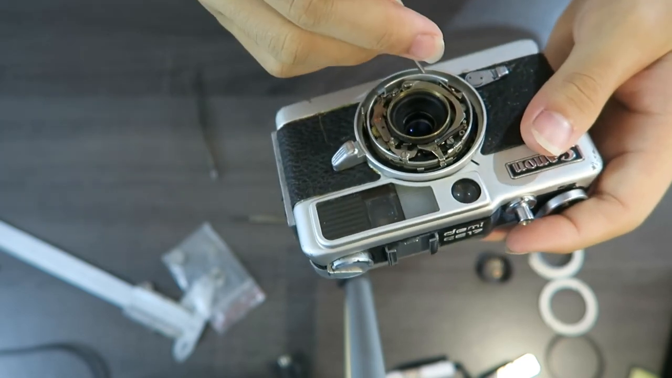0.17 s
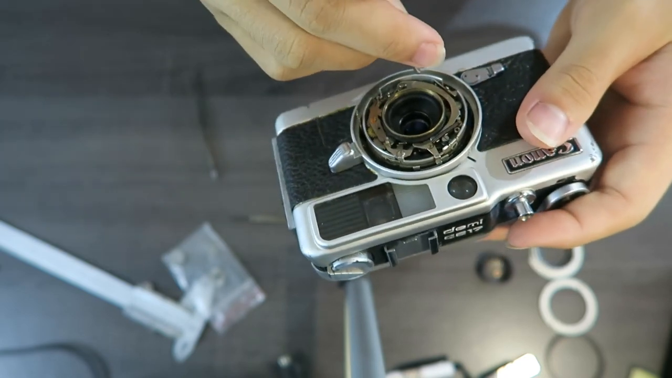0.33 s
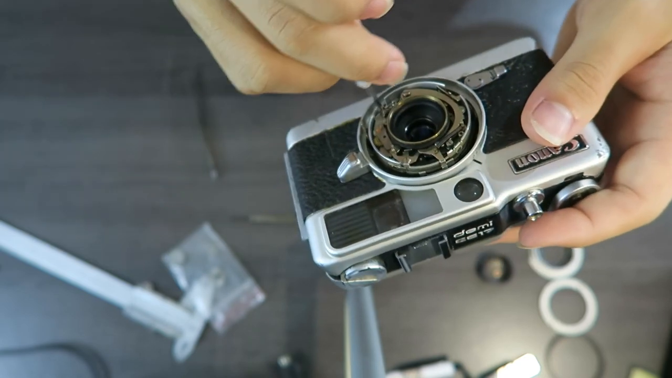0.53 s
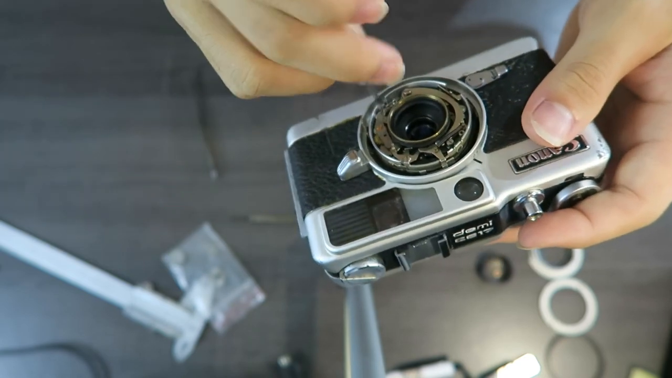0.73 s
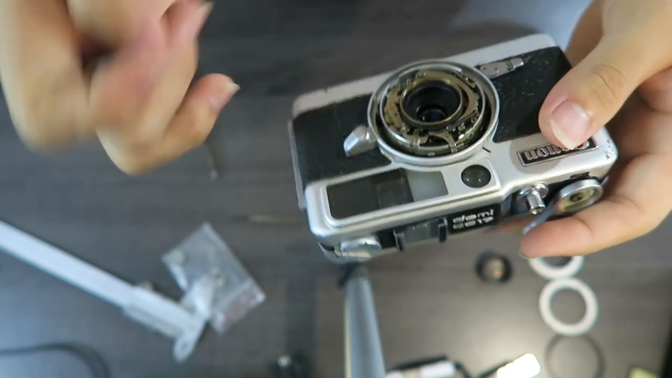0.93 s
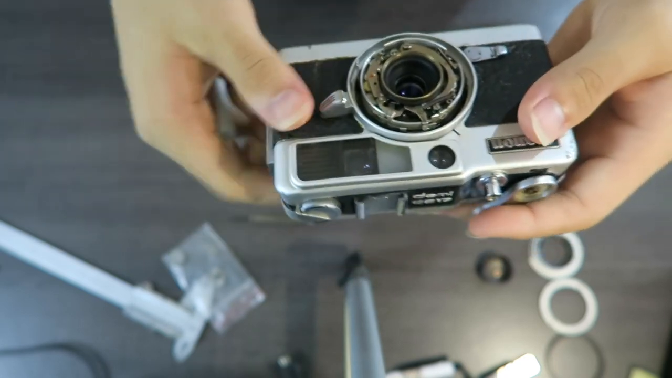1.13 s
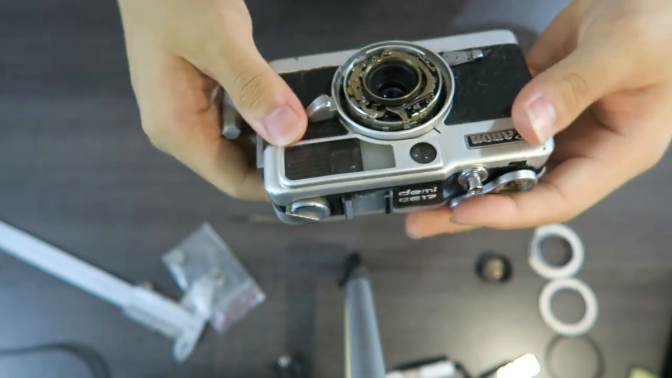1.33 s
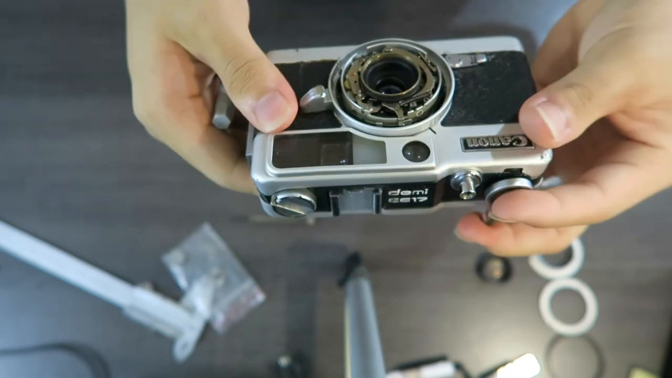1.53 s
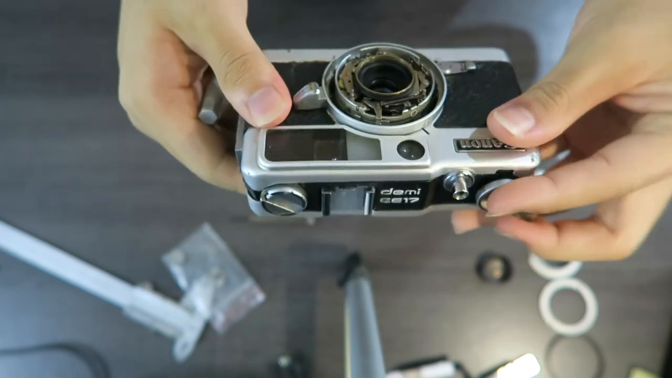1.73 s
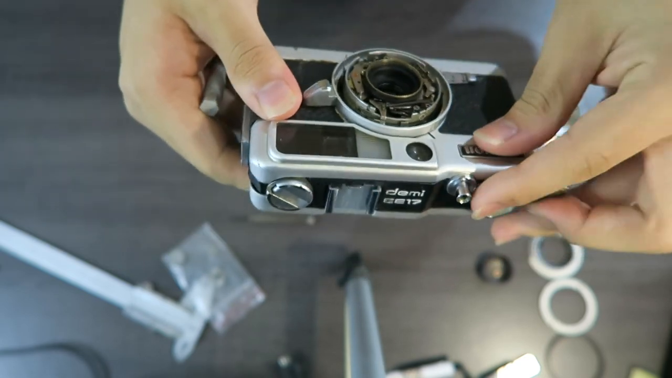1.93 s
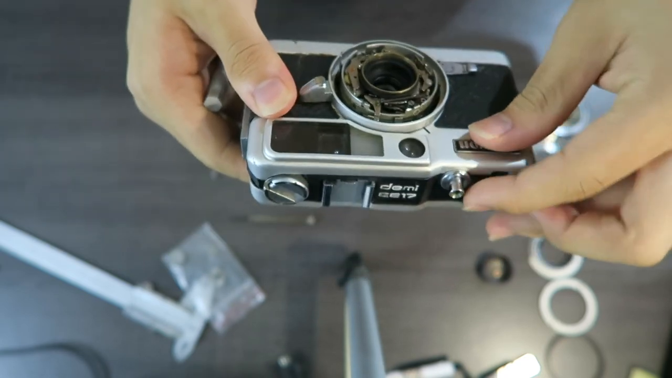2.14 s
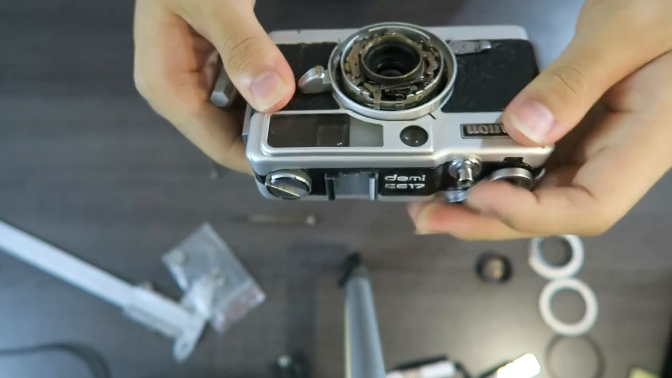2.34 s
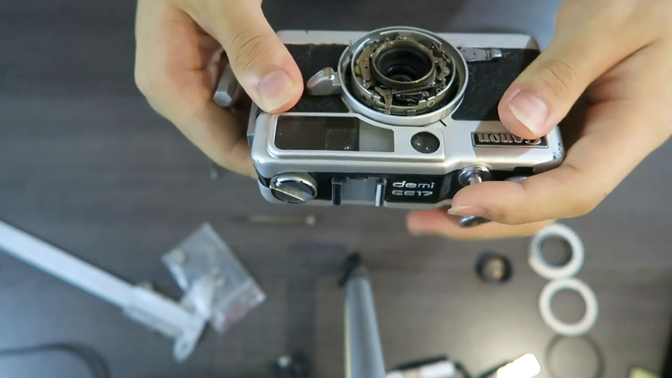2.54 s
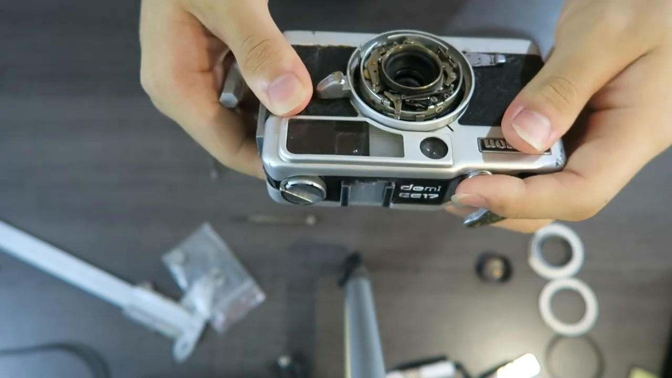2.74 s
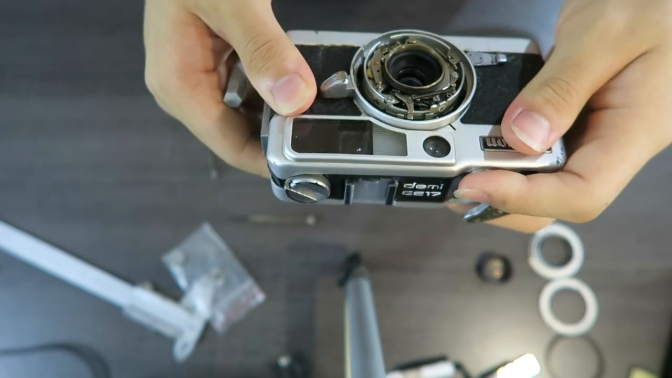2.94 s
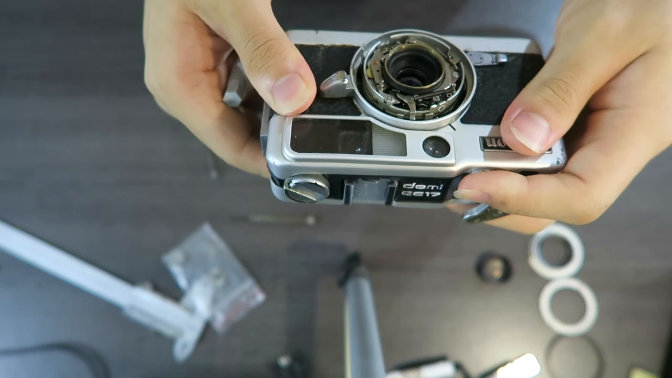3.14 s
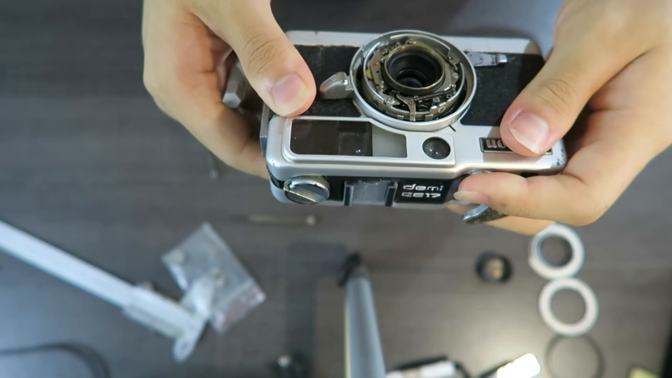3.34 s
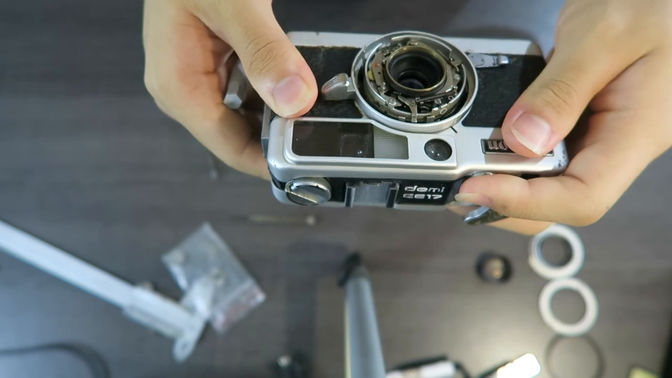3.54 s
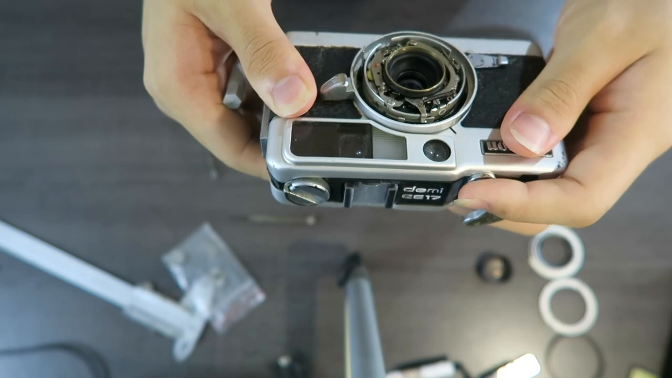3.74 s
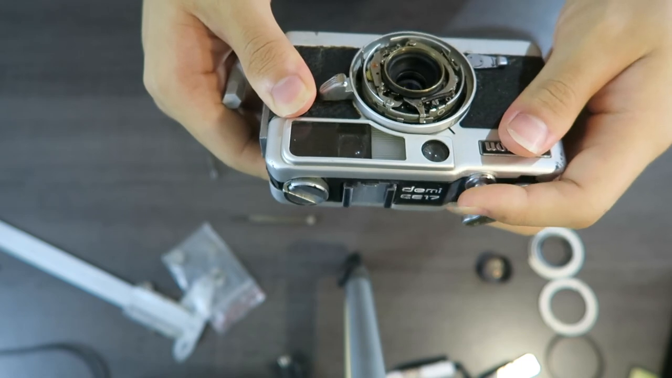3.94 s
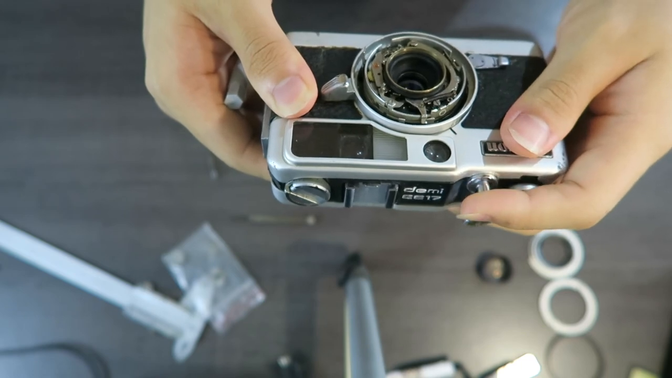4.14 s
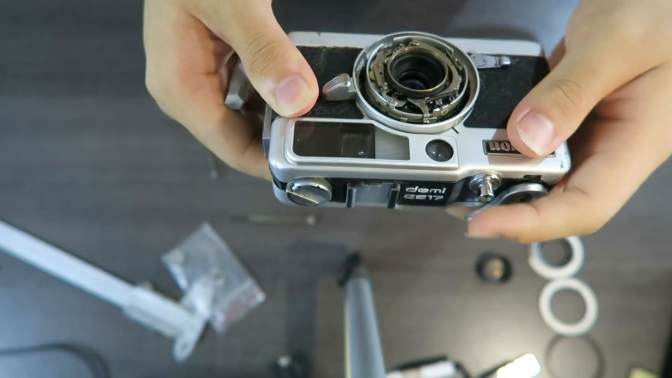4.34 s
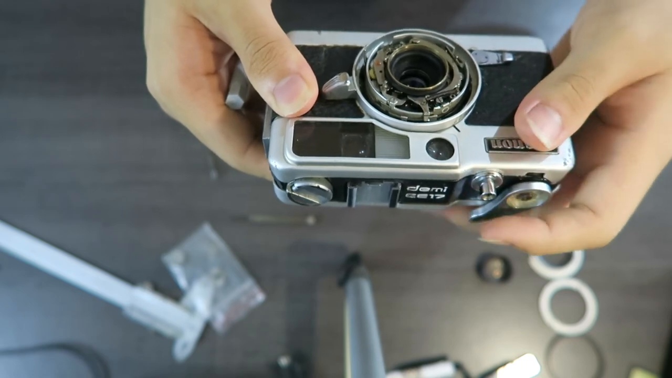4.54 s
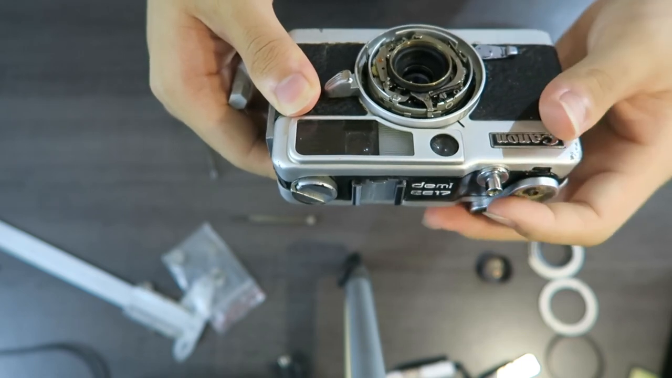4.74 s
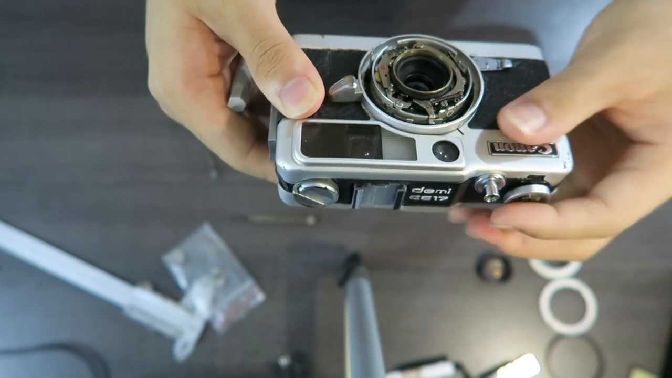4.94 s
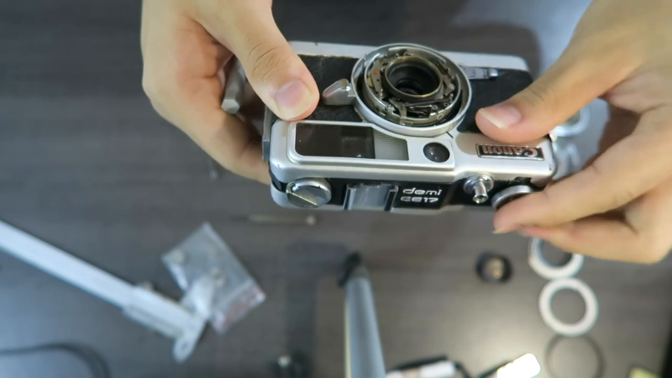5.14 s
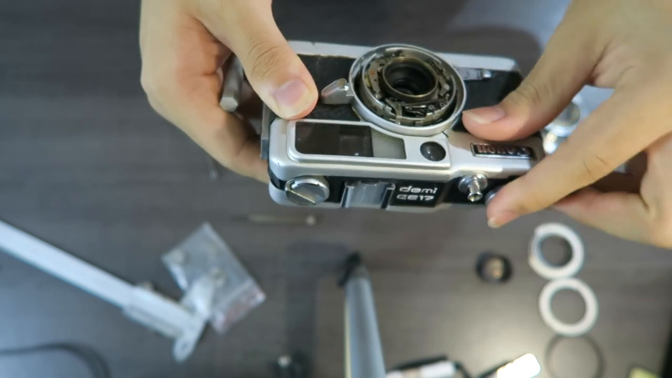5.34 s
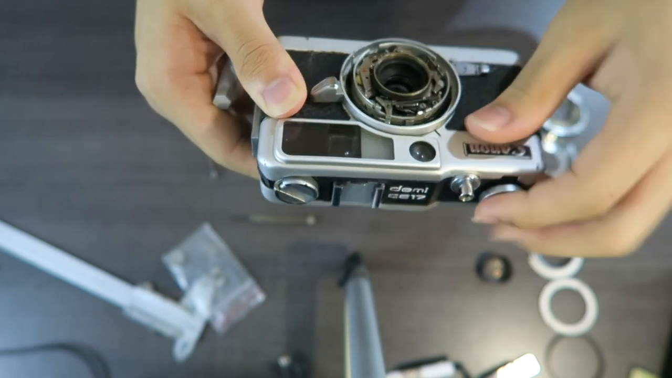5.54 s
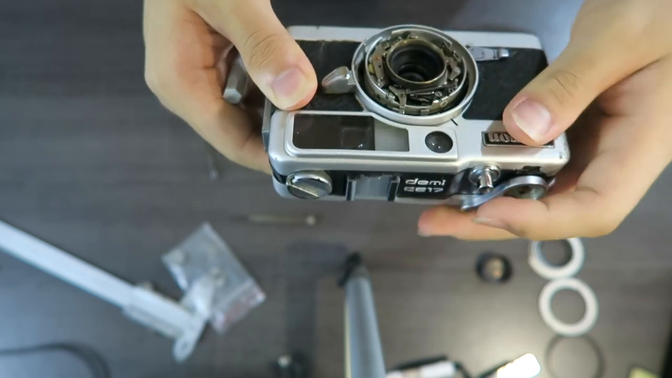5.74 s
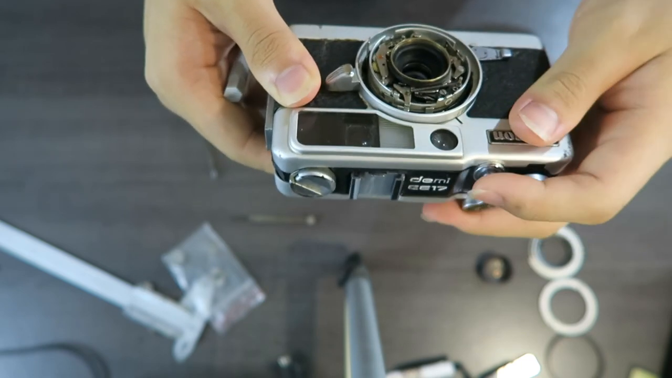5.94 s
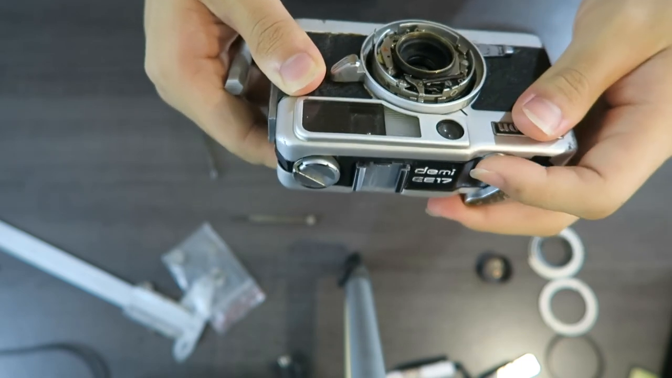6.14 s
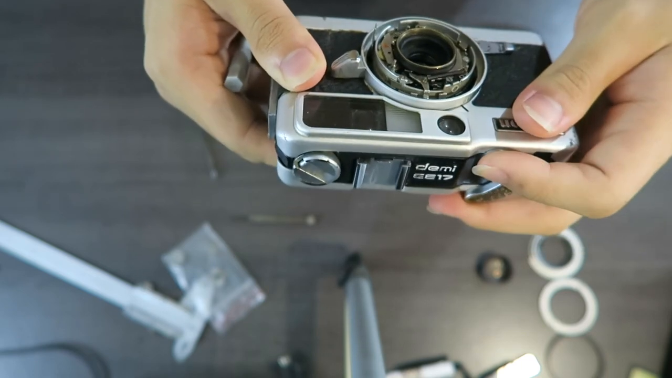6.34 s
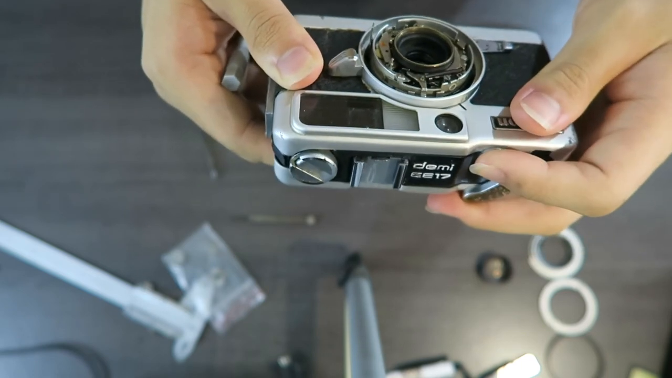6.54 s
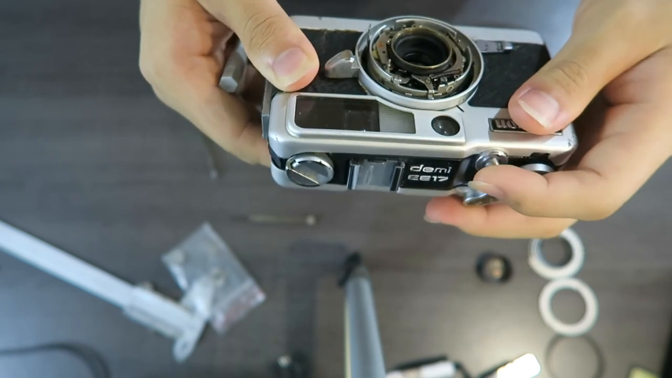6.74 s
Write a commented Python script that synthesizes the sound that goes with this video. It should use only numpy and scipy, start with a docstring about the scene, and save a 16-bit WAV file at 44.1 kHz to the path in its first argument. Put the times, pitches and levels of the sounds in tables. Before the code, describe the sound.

Very close stereo phone pickup at a desk in a quiet room: hands work a small metal camera with its shutter exposed. Faint ticks and scratchy rubs come first, then a lever snap and a thin gear whir, a rapid ratchet return, a loud shutter snap with short buzz, and a near-still pause. The winding and firing then repeat over a faint, uneven low hum and soft hiss.

```python
"""Small film camera, wound and fired

A small film camera with its shutter laid open is wound and fired by hand just under a phone on a desk.
Levers snap and a ratchet ticks as noise bursts ringing the thin metal body; a gear train whirs as ticking
teeth through resonances; finger rubs and the rustling tails after some blows are tiny random contacts.
Under it lie a throbbing low hum around 120 and 133 Hz, drawn as one line following the stronger pitch,
and faint room hiss made of filtered noise."""
import sys
import numpy as np
from scipy import signal
from scipy.fft import rfft, irfft
from scipy.io import wavfile
from scipy.ndimage import uniform_filter1d

SR = 44100
rng = np.random.default_rng(int(sys.argv[2]) if len(sys.argv) > 2 else 0)


def put_to_file(sound):
    """Save the sound as 16-bit audio at rate SR, in the file named by the first command-line argument."""
    columns = np.atleast_2d(sound).T  # one column per channel
    safe = np.clip(columns, -1, 1)
    whole_steps = np.round(safe * 32767)
    wavfile.write(sys.argv[1], SR, whole_steps.astype(np.int16))


N = 303849
TIME = np.arange(N) / SR


def undb(db):
    """Turn decibels into a plain gain."""
    return 10 ** (np.asarray(db) / 20)


def level(x, db):
    """Scale a sound by its RMS (average strength) to a level in dB."""
    return x * undb(db) / np.sqrt(np.mean(x ** 2))


def shaped(x, gain_at):
    """Filter by a gain given as a function of frequency."""
    f = np.maximum(np.fft.rfftfreq(len(x), 1 / SR), 1)
    return irfft(rfft(x) * gain_at(f), len(x))


def slope(points):
    """Gain along (Hz, dB) points, joined by straight lines on a log frequency axis."""
    hz, db = np.transpose(points)
    return lambda f: undb(np.interp(np.log(f), np.log(hz), db))


def mode(f, hz, width):
    """Complex response of one resonance, gain 1 at its centre."""
    return 1 / (1 + 1j * (f / hz - hz / f) * hz / width)


def narrow_noise(hz, width, db):
    """Noise squeezed twice through one resonance, so only a narrow band is left."""
    return level(shaped(rng.standard_normal(N), lambda f: mode(f, hz, width) ** 2), db)


def walk(rate):
    """Random levels held 1 / rate seconds and smoothed twice; spread near 1."""
    k = int(SR / rate)
    steps = np.repeat(rng.standard_normal(N // k + 1), k)
    return 1.3 * uniform_filter1d(uniform_filter1d(steps, k), k)[:N]


def grains(rate, spread_db, smooth):
    """Tiny random contacts of uneven size (rate per second) over a smooth scrape."""
    hit = rng.random(N) < rate / SR
    size = undb(spread_db * np.minimum(rng.exponential(size=N), 4))
    contacts = level(hit * size * rng.standard_normal(N), 0)
    return contacts + smooth * rng.standard_normal(N)


# The low hum around 120 and 133 Hz, drawn as one line following the stronger pitch.
# Each row: time in seconds, pitch in Hz, level in dB.
HUM = [(0.0, 114.9, -49), (0.21, 128.9, -56), (0.31, 114.9, -49.5), (1.0, 118.8, -49.5), (1.09, 133.5, -54),
       (1.3, 132.7, -46.5), (1.42, 120.9, -48.5), (3.01, 123.7, -42), (3.05, 120.4, -56),
       (3.15, 130, -48.5), (3.43, 132.9, -39.5), (3.67, 124.3, -40.5), (3.84, 133.1, -37.5),
       (4.09, 134.0, -44), (4.22, 135.4, -32), (4.45, 134.1, -47.5), (4.8, 133, -34), (4.85, 136.3, -56.5),
       (4.99, 121, -53), (5.35, 131.6, -43), (5.64, 133, -50.5), (5.76, 122.3, -47.5), (5.97, 121.7, -43),
       (6.12, 125, -57), (6.43, 134.3, -48), (6.72, 129.4, -57.5), (6.89, 132, -57)]
# Low rumbles beside it. Each row: centre in Hz, width of one filter pass in Hz, level in dB.
RUMBLE = [(51.3, 26, -52), (84, 18, -48.5), (180.4, 12, -56.5)]


def hum():
    """A throbbing low hum as one sine line between about 120 and 133 Hz, with narrow rumbles."""
    s, hz, db = np.transpose(HUM)
    pitch = np.interp(TIME, s, hz) + 4 * walk(21)
    turn = 2 * np.pi * np.cumsum(pitch) / SR
    strength = np.sqrt(2) * undb(np.interp(TIME, s, db) + 2.7 * walk(25))
    rumble = sum(narrow_noise(*row) for row in RUMBLE)
    # the hum reaches one microphone port a little earlier
    return rumble + strength * np.array([np.sin(turn + 0.24), 1.2 * np.sin(turn - .15)])


# Colour of the hiss shared by both channels. Each row: frequency in Hz, gain in dB.
HISS = [(18, -55), (30, -26), (134, -10), (239, -20), (328, -22.5), (937, -34.5), (2290, -37.5),
        (6210, -48), (7090, -48.5), (11700, -58.5), (13000, -76), (14400, -70), (16000, -104.5)]
# Colour of the hiss that is opposite left and right. Each row: frequency in Hz, gain in dB.
WIDE = [(18, -82.5), (30, -54.5), (64, -28), (131, -10), (204, -19.5), (287, -9), (384, -17.5),
        (449, -11.5), (569, -21), (780, -22), (3980, -40.5), (14000, -52), (16000, -82)]
# Faint thin lines in the hiss. Each row: centre in Hz, width of one filter pass in Hz, level in dB.
WHINE = [(7020, 180, -73), (14100, 300, -81.5)]
HISS_DB, WIDE_DB = -49, -49


def air():
    """Steady filtered noise, partly opposite in the two channels."""
    mid = level(shaped(rng.standard_normal(N), slope(HISS)), HISS_DB)
    side = level(shaped(rng.standard_normal(N), slope(WIDE)), WIDE_DB)
    thin = [sum(narrow_noise(*row) for row in WHINE) for _ in range(2)]
    return mid + np.array([side, -side]) + np.array(thin)


# Metal on metal. Each row: time in seconds, peak level at 3-7 kHz in dB, then against that peak
# the body knock in dB, the lever ring in dB and the bright tick in dB.
CLICKS = [(0.1071, -37, -9.5, -24, -7), (0.2991, -46.5, -8, 0, -32), (0.3667, -44, -4, -4, -11),
          (0.4204, -26.5, -10.5, -12, -7.5), (0.6007, -46, 4, 3, -9), (0.6274, -41.5, -8, -7, -5),
          (0.8115, -38, -20, -21, -1), (0.8204, -35.5, -27, -25, 0.5), (0.83, -30.5, -12.5, -30, -6.5),
          (0.8457, -41, -25, -24, -9), (0.9502, -45, -16, -0.5, -3), (1.2117, -47.5, -2, 5.5, -2),
          (1.2286, -39.5, -7, -6, -12), (1.2682, -41, -8, 6.5, -19), (1.281, -25, -23, -9, -17),
          (1.3915, -49, 4, 4.5, -23), (1.5929, -43, -4, 5.5, -7), (1.71, -32, -13, -5.5, -4.5),
          (1.8542, -42, 5.5, 15.5, -11), (1.9129, -40, -27, 5.5, -14), (1.9606, -24, -15, -6, 7),
          (1.9675, -12.5, -15.5, -2.5, 1.5), (2.3809, -22.5, -18, 3, -23), (2.5631, -29.5, -10, -2, -14),
          (2.7104, -40, -15, -5, -23), (2.721, -44, -2, 7.5, -3), (2.7358, -44, -16, -14, -8),
          (2.8013, -47, -2, -1, -5), (2.9435, -7.5, -16.5, -7, 4), (3.7821, -40, -22, -7.5, 9),
          (3.7943, -24, -9, 0, 8), (3.7996, -14.5, -11.5, -3.5, 6), (4.129, -52, -16, 1, -15),
          (4.1437, -44, -21, -19.5, -19), (4.1551, -47, -9.5, 5, -23), (4.3981, -37.5, -25, 1, -2.5),
          (4.7361, -26.5, -8, 2, -31), (4.9297, -41, -14, 2, -16), (5.3152, -25.5, 2.5, -12, 8),
          (5.3223, -13, -19, -1, 2), (5.711, -18, -16, 2.5, -27), (6.008, -41, -19, -16, -19),
          (6.0172, -45.5, -23, 5, -6), (6.0367, -44, -30, -1, -7), (6.0964, -38.5, -21, 1, -25),
          (6.2008, -8.5, -13, -5, 2.5), (6.7236, -23, -7.5, -2, 2.5), (6.7356, -12.5, -16, -3, 3),
          (6.847, -46, 2, 7.5, -3)]
PAWL_KNOCK_DB, PAWL_RING_DB, PAWL_TICK_DB = -19.5, -8, -4  # against the peak
PAWL_DULLS_DB, PAWL_FIRST_DB = -1.5, -1.5  # tick change per tooth; the first tooth is softer


def struck():
    """All contacts: single clicks and the teeth of each ratchet run."""
    contacts = list(CLICKS)
    for run, (_, db, _) in zip(teeth_s(), RATCHETS):
        for k, s in enumerate(run):
            peak_db = db + PAWL_FIRST_DB * (k == 0)
            contacts.append((s, peak_db, PAWL_KNOCK_DB, PAWL_RING_DB, PAWL_TICK_DB + PAWL_DULLS_DB * k))
    return contacts


# The four bands of a click: main snap, body knock, lever ring, bright tick.
# Each row: low edge in Hz, high edge in Hz.
CLICK_EDGES_HZ = [2900, 7200], [400, 1250], [1150, 3100], [6800, 14500]
# How the metal body rings, also under rubbing. Each row: pitch in Hz, level in dB,
# seconds to fade by 60 dB.
BODY = [(720, 8, 0.11), (1026, -8.5, 0.029), (1517, -2, 0.082), (1700, -4, 0.0067), (2460, -2, 0.064),
        (3245, -11, 0.055), (3770, -5, 0.0041), (4670, -24.5, 0.027), (6400, -8, 0.012), (7600, -10, 0.016),
        (10500, -15, .03), (11400, -9.5, 0.036), (12300, -10.5, 0.017)]
# Desk and walls answer each click band, in the same order.
# Each row: level in dB, seconds to fade by 60 dB.
TAILS = [(-25.5, 0.43), (-12, 0.27), (-23, 0.42), (-24.5, 0.22)]
CONTACT_MS = 12.06  # the main burst falls 60 dB in this time, the weaker rattle 14 dB


def clicks(size=16384):
    """Short noise bursts ring the body, a different mix for each contact, then a diffuse tail."""
    t, f = np.arange(size) / SR, np.maximum(np.fft.rfftfreq(size, 1 / SR), 1)
    rings = np.array([undb(db) * mode(f, hz, np.log(1000) / np.pi / t60) for hz, db, t60 in BODY])
    filters = [signal.butter(2, edges, "bandpass", fs=SR, output="sos") for edges in CLICK_EDGES_HZ]
    bands = np.array([signal.sosfreqz(sos, f, fs=SR)[1] for sos in filters])
    fades = np.array([undb(db - 60 * t / t60) * np.minimum(t / 0.0041, 1) for db, t60 in TAILS])
    # each click is a burst with a short soft onset, a quick drop and a weaker rattle
    age = 1000 * t / CONTACT_MS
    burst_shape = np.minimum(age / 0.19, 1) ** 3 * (undb(-60 * age ** 1.1) + undb(-23.0 - 14 * age))
    out = np.zeros(N + size)
    for s, peak_db, knock_db, ring_db, tick_db in struck():
        burst = rng.standard_normal((len(bands), size)) * burst_shape
        colour = 1 + 2.4 * (undb(4 * rng.standard_normal(len(BODY))) @ rings)
        hit = irfft(rfft(burst) * colour * bands)
        # bring the loudest moment of each band to one common peak
        hit /= np.sqrt(uniform_filter1d(2 * hit ** 2, size=64).max(axis=1, keepdims=True))
        tail = irfft(rfft(rng.standard_normal((len(bands), size))) * bands)
        tail *= fades / tail.std(axis=1, keepdims=True)
        gains = undb(peak_db + np.array([0, knock_db, ring_db, tick_db]))
        out[int(s * SR):][:size] += gains @ (hit + tail)
    return out[:N]


# Rubs and scuffs of fingers and levers, and the rustling tails after some blows.
# Each row: start in seconds, rise in seconds, hold in seconds, seconds to fade by 60 dB,
# level in dB, bright hiss against it in dB, creak pitch in Hz, creak against it in dB.
RUBS = [(0.12, 0.0025, .005, 0.26, -63.5, 1, 770, -1), (0.416, 0.0041, .005, 0.12, -41.5, -8, 1500, -10),
        (0.45, 0.029, 0.034, 0.27, -45, -4, 2950, -15), (.49, 0.021, 0.017, 0.098, -58, -12, 800, 9),
        (.55, 0.019, .06, 0.075, -59, -5, 920, -8), (0.778, 0.026, .01, 0.21, -48, -8, 760, -10),
        (1.039, 0.028, 0.016, 0.39, -57, -7, 3100, -5), (1.283, .003, .003, 0.22, -42, -26, 2460, -26),
        (1.353, .01, .01, .15, -59, -14, 744, 10.5), (1.415, .02, .04, 0.25, -62, -8, 690, 11),
        (1.514, .015, .02, .2, -64.5, -9, 795, 9), (2.398, 0.015, 0.029, 0.091, -38, -18, 2430, -4.5),
        (2.469, .035, .01, 0.15, -48.5, -13, 1590, -11), (2.724, .004, .01, .15, -60, -5, 1700, -2.5),
        (2.764, .015, .025, .15, -60.5, -9, 1609, 5), (4.733, .003, .003, 0.32, -38, -25, 766, -10),
        (4.841, 0.0092, 0.019, 0.062, -42.5, -15.5, 2546, -3),
        (5.06, .02, 0.0048, .12, -60, -0.5, 1650, 1.5), (5.117, .005, .04, 0.47, -61, -20, 1710, 2.5),
        (5.723, .002, .003, .2, -35.5, -28, 2280, -3), (5.79, 0.031, 0.096, 0.36, -62.5, -23.5, 760, -4),
        (6.0, .005, 0.047, .2, -60, -10, 754, -6.5), (6.06, 0.029, 0.0035, 0.045, -47, -13, 1900, 1.5),
        (6.71, 0.0031, .01, 0.045, -51.5, -1, 757, -3.5)]
CREAK_Q = 3.7  # pitch over width, for each of two filter passes
RUB_RISE_DB = 18.5  # each row swells by this much over its rise


def rubs_and_tails(body, bright, slip):
    """Each rub, scuff or rustling tail rises, holds and fades, with a creak at its own pitch."""
    out = np.zeros(N)
    for s, rise, hold, t60, db, bright_db, hz, creak_db in RUBS:
        age = TIME - s
        swell = RUB_RISE_DB * np.clip(age / rise - 1, -1, 0)
        fade = -60 * np.maximum(age - rise - hold, 0) / t60
        peak = signal.iirpeak(hz, CREAK_Q, fs=SR)
        creak = level(signal.lfilter(*peak, signal.lfilter(*peak, slip)), creak_db)
        out += (age > 0) * undb(db + swell + fade) * (body + undb(bright_db) * bright + creak)
    return out


# Colour of rubbing heard through the shell. Each row: frequency in Hz, gain in dB.
SHELL = [(650, -44), (1100, -9), (1260, -39.5), (1580, -14), (2190, -3.5), (2450, -12), (2690, -3),
         (3310, -8), (6000, -15), (7800, -49), (13200, -120)]


def rubs():
    """Stick-slip grains (catching and letting go) through the shell, with skin hiss and a creak."""
    slip, skin = (undb(2.2 * walk(180)) * grains(4000, 1.3, 0.23) for _ in range(2))
    bright = shaped(skin, lambda f: mode(f, 8500, 6000) ** 2)

    def shell_gain(f):
        ringing = sum(undb(db) * mode(f, hz, 5 / t60) for hz, db, t60 in BODY)
        return slope(SHELL)(f) * (1 + 2.5 * ringing)

    body = shaped(slip, shell_gain)
    return rubs_and_tails(level(body, 0), level(bright, 0), slip)


ROOM_T60_S, ROOM_DB = .3, -8  # time to fade by 60 dB; strength before the treble is dulled
ROOM_TOP_HZ, ROOM_WIDTH = 8750, .3  # treble falls above this; share that is opposite left and right


def room(x, size=16384):
    """Desk and walls answer with a short dull noise tail, a little different in each channel."""
    t = np.arange(size) / SR
    fade = undb(-60 * t / ROOM_T60_S) * np.minimum(t / 0.0024, 1)
    mid, side = rng.standard_normal((2, size)) * fade
    tails = np.array([mid + ROOM_WIDTH * side, mid - ROOM_WIDTH * side])
    dull = signal.lfilter(*signal.butter(1, ROOM_TOP_HZ, fs=SR), tails)
    dull = dull / np.sqrt(np.sum(mid ** 2))
    return undb(ROOM_DB) * signal.fftconvolve(x[None], dull, axes=1)[:, :N]


# Parts that ring on alone, the shutter spring longest. Each row: start in seconds, pitch in Hz,
# starting level in dB, seconds to fade by 60 dB.
SPRING = [(1.284, 2460, -27.5, 0.047), (2.947, 887, -48, 0.68), (5.260, 520, -39, 0.064),
          (5.325, 720, -23.5, 0.062), (6.204, 876, -46.5, 0.78), (6.738, 720, -27, 0.1)]


def spring():
    """Thin sine tones that fade at a steady rate in dB."""
    out = 0
    for s, hz, db, t60 in SPRING:
        age = np.maximum(TIME - s, 0)
        out = out + undb(db - 60 * age / t60) * np.sin(2 * np.pi * hz * age)
    return out


# Gear train running. Each row: start in seconds, length in seconds, whir level in dB,
# sag in dB per second (negative swells), seconds until it eases off,
# darker rattle against the whir in dB.
GEARS = [(1.738, .478, -36, 23, 0.57, -10), (2.938, 0.21, -37.5, -8, 0.14, -9.5),
         (5.115, 0.471, -37, 20.5, 0.484, -10.5), (6.211, 0.2, -38, -10, .13, -13)]
GEAR_KICK_DB, GEAR_KICK_S = 1, .03  # a little louder as it starts
GEAR_EASE_DB, GEAR_EASE_S, GEAR_STOP_DB_PER_S = -8, 0.0072, 1500


def running():
    """Whir and rattle gains: each run starts with a kick, sags or swells, may ease off, and stops."""
    whir, rattle = np.zeros((2, N))
    for s, length, db, sag, ease_s, rattle_db in GEARS:
        age = np.maximum(TIME - s, 0)
        kick = GEAR_KICK_DB * np.exp(-age / GEAR_KICK_S)
        ease = GEAR_EASE_DB * np.clip((age - ease_s) / GEAR_EASE_S, 0, 1)
        stop = GEAR_STOP_DB_PER_S * np.maximum(age - length, 0)
        gain = (TIME > s) * undb(db + kick - sag * age + ease - stop)
        whir, rattle = whir + gain, rattle + gain * undb(rattle_db)
    return whir, rattle


# How the small wheels ring. Each row: pitch in Hz, width in Hz, gain in dB.
TEETH = [(5380, 59, -17.5), (5830, 52, -22.5), (6300, 59, -22), (7470, 230, -12), (8730, 330, -3),
         (9680, 97, 4.5), (10620, 340, 1.5), (11300, 81, -7), (12000, 95, -10.5), (13500, 590, -9.5),
         (15000, 230, -5)]
# Colour of the rattling plates. Each row: frequency in Hz, gain in dB.
RATTLE = [(290, -35), (500, -10), (873, -3), (1180, -19), (1650, -7.5), (1920, -10), (2290, -2.5),
          (5920, -12.5), (8000, 0), (10400, -31.5), (17600, -120)]


def gears():
    """Teeth tick about 340 times a second and ring the small wheels; the plates rattle darker."""
    phase = np.cumsum(340 * (1 + 0.041 * walk(30))) / SR % 1
    ticking = 1.7 + np.exp(-phase / .3)
    teeth = ticking * undb(0.46 * walk(75)) * grains(4000, 2.0, 0.85)
    broad = shaped(teeth, lambda f: .45 * mode(f, 10000, 9000))
    wheels = shaped(teeth, lambda f: sum(undb(db) * mode(f, hz, w) for hz, w, db in TEETH))
    rattle = shaped(teeth, lambda f: slope(RATTLE)(f) * (1 + 3.2 * np.abs(mode(f, 1500, 150))))
    whir_gain, rattle_gain = running()
    return whir_gain * level(broad + wheels, 0) + rattle_gain * level(rattle, 0)


# The wind lever swings back over its ratchet. Each row: first tooth in seconds,
# peak level at 3-7 kHz in dB, slowness of the swing as a factor on time.
RATCHETS = [(2.2648, -32, .99), (5.594, -30.5, 1.015)]
# The pawl (a small catch) drops on each tooth. Each entry: seconds after the first tooth,
# before the slowness factor.
PAWL_S = [0, .017, .0295, .0405, .0515, .063, .076, .089, .1035]


def teeth_s():
    """Times in seconds at which the pawl drops, run by run."""
    return [[s + slow * late for late in PAWL_S] for s, db, slow in RATCHETS]


# The pawl's own ring, varied at random for each tooth. Each row: middle pitch in Hz,
# middle level in dB, seconds to fade by 60 dB.
PAWL_MODES = [(3520, -30, .016), (4880, -35.5, 0.02), (5800, -45, .015), (2480, -43.5, 0.025)]


def pawl(size=2048):
    """Short fading tones after each tooth but the soft first one, in a new random mix each time."""
    t, out = np.arange(size) / SR, np.zeros(N)
    hz, db, t60 = np.array(PAWL_MODES).T[:, :, None]
    for s in np.array(teeth_s())[:, 1:].ravel():
        gain, tune = rng.standard_normal((2, len(hz), 1))
        fade = undb(db + 2.5 * gain - 60 * t / t60)
        ring = fade * np.sin(2 * np.pi * hz * (1 + 0.039 * tune) * t)
        out[int(s * SR):][:size] += ring.sum(axis=0) * np.minimum(t / .0015, 1)
    return out


def scene():
    """Mix the camera, the room's answer, the hum and the air in stereo."""
    steady = spring() + pawl() + gears() + rubs()
    camera = clicks() + steady
    # the treble reaches the two ports a little apart in time
    side = shaped(camera, lambda f: -1j * (0.055 + .3 * np.abs(mode(f, 8600, 7000))))
    lean = .02 * np.array([-camera, camera])  # slightly louder on the right
    # the clicks carry their own tails, so only the other camera sounds feed the room
    return camera + np.array([side, -side]) + lean + room(steady) + hum() + air()


# Colour of the microphone. Each row: frequency in Hz, gain in dB.
MIC = [(9000, -2), (12500, 1), (13500, -3), (16000, -8.5)]
TOP_HZ = 15800  # nearly everything above this is cut


def record(dry):
    """The microphone colours the treble, peaks beyond full scale are clipped, and the top is cut."""
    heard = np.clip([shaped(ch, slope(MIC)) for ch in dry], -1, 1)
    top_cut = signal.ellip(8, .2, 70, TOP_HZ, fs=SR, output="sos")
    return np.clip(signal.sosfilt(top_cut, heard), -1, 1)


dry = scene()
out = record(dry)
put_to_file(out)
```